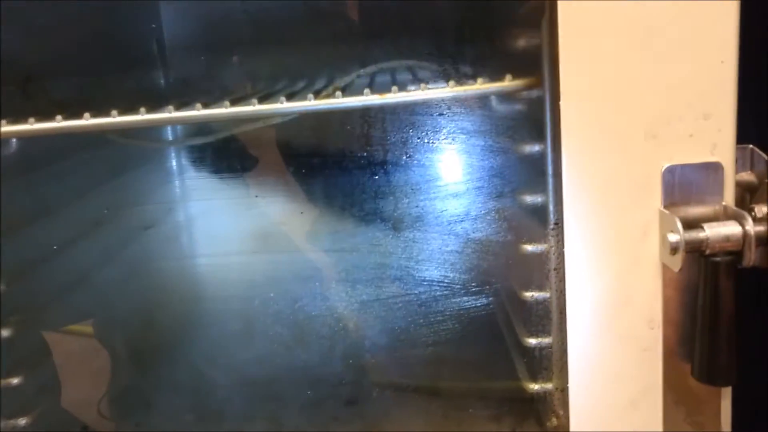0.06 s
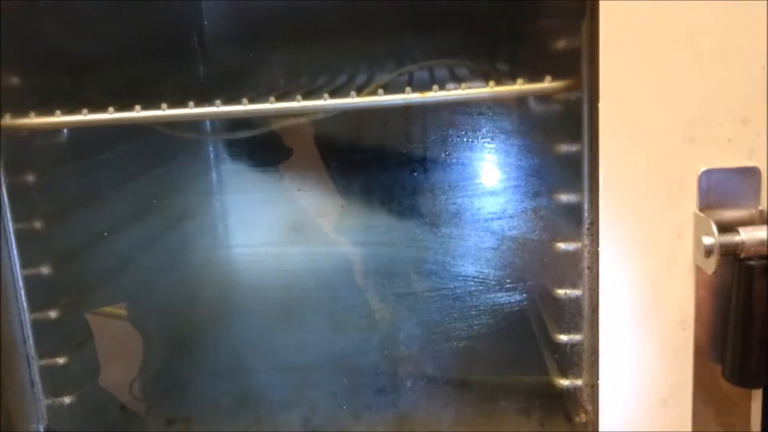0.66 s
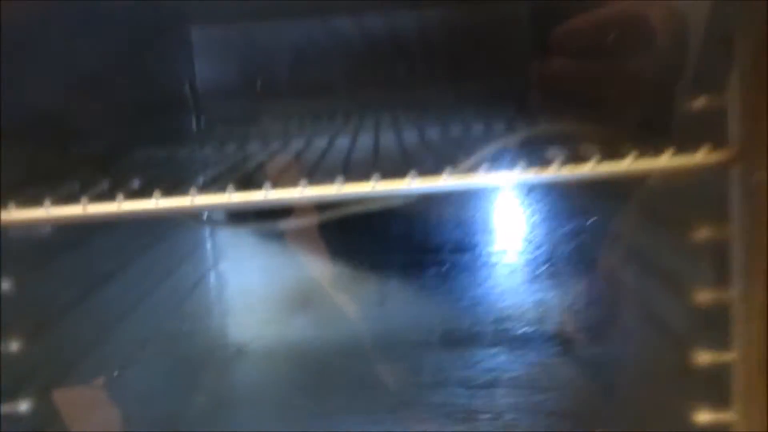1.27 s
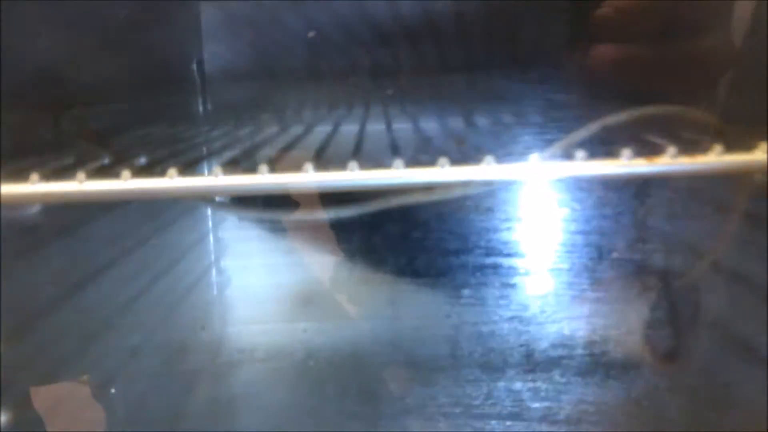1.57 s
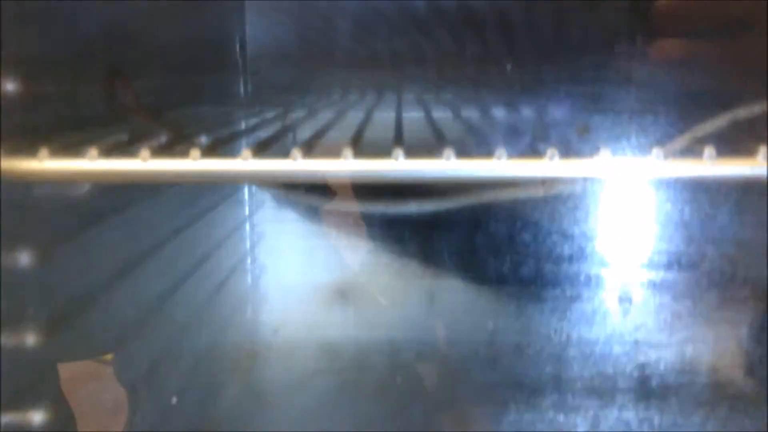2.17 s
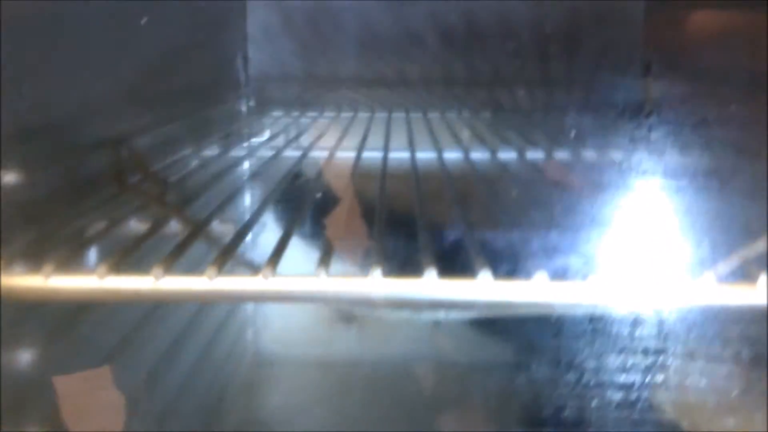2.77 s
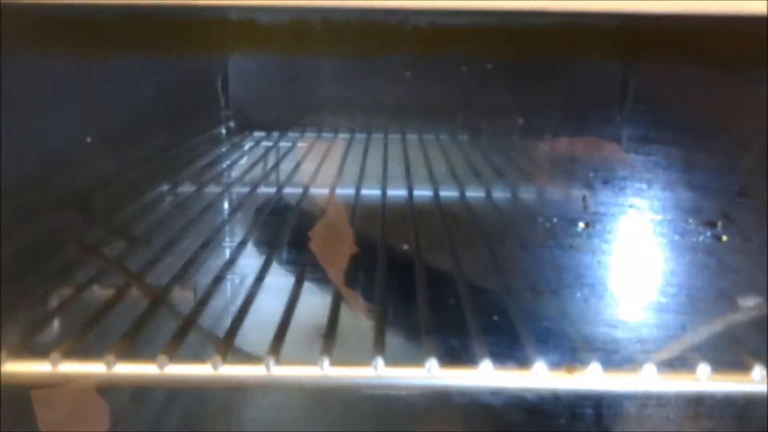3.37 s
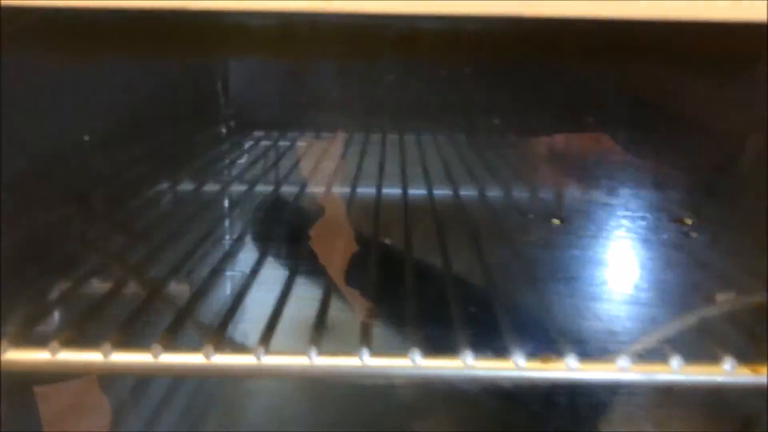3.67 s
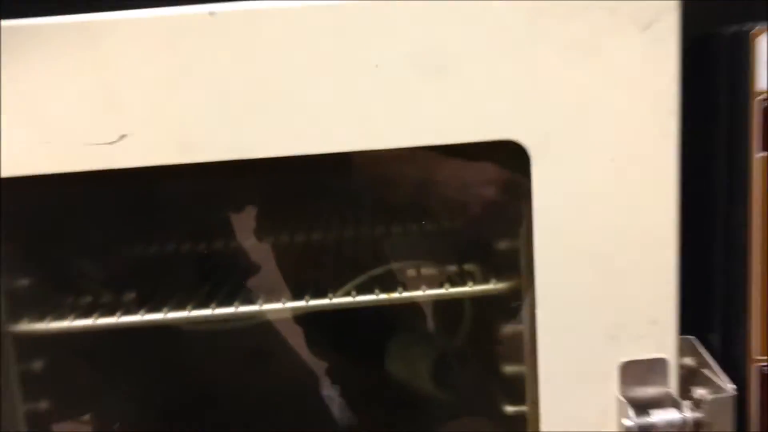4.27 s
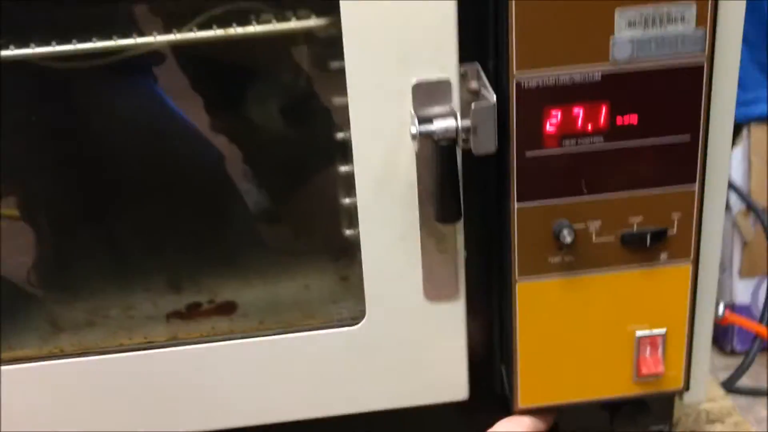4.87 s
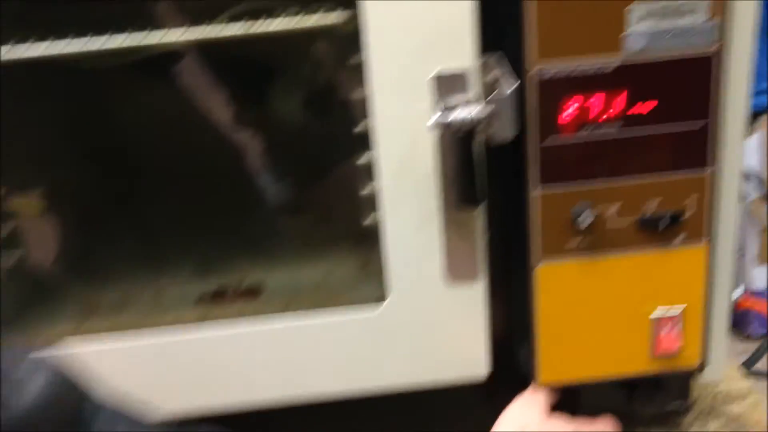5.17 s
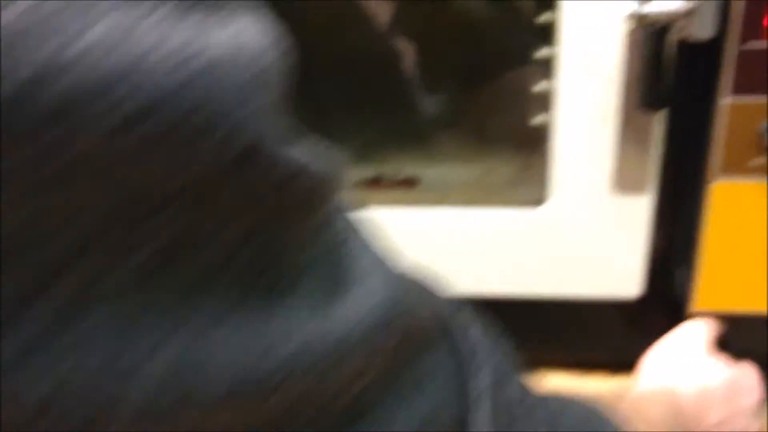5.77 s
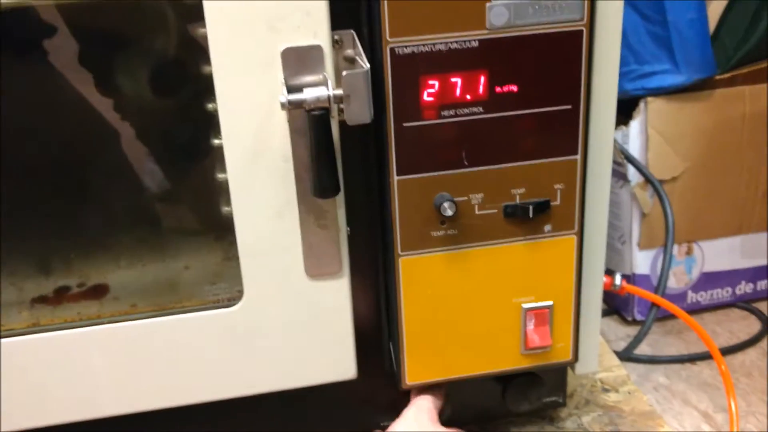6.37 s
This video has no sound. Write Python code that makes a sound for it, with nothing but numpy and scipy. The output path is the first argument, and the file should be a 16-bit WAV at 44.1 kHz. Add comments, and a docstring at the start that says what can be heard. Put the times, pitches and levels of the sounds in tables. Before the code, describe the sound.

A small piston air compressor drones and buzzes in a workshop while a vacuum generator hisses constantly beside a steel oven. Light handling bumps lead to a hard knock about a second in, which briefly ducks the sound. The hum and the slightly metallic hiss shift in tone as the hand-held microphone moves from the oven window to the control panel. A short cluster of knocks lands near the end.

```python
"""A small piston air compressor drones from the start, its valves buzzing, while a venturi vacuum generator
hisses beside a ringing steel oven. We listen through a hand-held phone at the oven door. Light handling
bumps lead to a hard knock at 1.2 s that ducks the phone's gain control. The phone rises to the window,
then from 4.3 s backs off to the control panel; the room's standing waves recolour hum and hiss on the way.
A last cluster of knocks lands just after 6 s."""
import sys
import numpy as np
from scipy import signal
from scipy.io import wavfile
from scipy.ndimage import uniform_filter1d

SR = 44100
rng = np.random.default_rng(int(sys.argv[2]) if len(sys.argv) > 2 else 0)


def output_pcm(signal):
    """Save a mono or channel-first signal as 16-bit PCM at the path in sys.argv[1].

    Samples are clipped to [-1, 1] before scaling.
    """
    pcm = np.clip(np.atleast_2d(signal).T, -1, 1) * 32767
    wavfile.write(sys.argv[1], SR, np.round(pcm).astype(np.int16))


N = 292383
TIME = np.arange(N) / SR
FRAME = 2048
SHAFT_HZ = 58.55

# the phone's move (0 door, 1 window, 2 panel): t/s, place for the hum, place for the hiss
PHONE_PATH = [(1.2, 0, 0), (1.5, 0.95, 1), (4.32, 1.03, 0.81), (4.5, 1.82, 1.4), (4.72, 1.73, 0.94),
              (4.87, 2.04, 2.24), (6.3, 1.98, 1.7)]
# pump partials: shaft multiple (rounded in use), level/dB at door, window, panel, left minus right/dB
PUMP_PARTIALS = [(1, -49, -49, -49.5, 21), (1.98, -46.5, -46.5, -47, 43), (3, -41.5, -38, -42.5, 3.5),
                 (4, -44, -41.5, -49, 11), (4.7, -49.5, -43.5, -36.5, 1), (5.95, -47, -45, -50.5, 11.5),
                 (7.14, -40.5, -42.5, -42, -12), (7.95, -56.5, -52, -48, 8), (9, -48, -48, -42, 1),
                 (10, -50, -48.5, -55.5, -44), (11, -51, -50.5, -51, 21), (12, -47, -51, -53.5, -12),
                 (13, -44.5, -49, -58, 2.5), (14, -50.5, -42.5, -37.5, 1), (15, -49.5, -52, -47.5, -6),
                 (16, -45, -47.5, -61, 5), (17, -62, -51, -44, 1), (19, -48.5, -69, -56, -3.5),
                 (20, -54, -60, -51, 0), (22, -48, -41, -49, 1), (26, -64, -57, -53.5, 7),
                 (28, -36.5, -43.5, -40.5, -0.5), (29, -57, -67, -44, -2.5), (30, -54, -43, -48, -6),
                 (34, -48.5, -43, -44, 1), (43, -45.5, -54.5, -54, -7), (46, -60, -58, -54, -4),
                 (47, -66, -50, -53, -11)]
# tone curve of the jet: f/Hz, level/dB at door, window, panel
JET_SPECTRUM = [(30, -80.0, -84.0, -81.0), (70, -71.5, -77.5, -76.5), (150, -70, -72, -70),
                (260, -74, -75.5, -73.5), (400, -70.5, -67.5, -70), (800, -71.5, -72.5, -72.0),
                (1150, -75.5, -76.0, -75.5), (1700, -71.5, -71.0, -70.5), (2150, -77.0, -75.0, -72.0),
                (2600, -74.0, -74.5, -71.0), (3300, -78.0, -77.0, -78.0), (4150, -77.5, -75.0, -76.5),
                (4700, -84.5, -78.0, -69.5), (5800, -74.5, -73.5, -74.0), (7300, -77.0, -76.5, -76.5),
                (9000, -81.0, -78.5, -75.0), (11500, -74.0, -77.5, -77.5), (14000, -80.0, -79.0, -77.5),
                (15400, -78.5, -79.5, -76.5)]
# steel resonances: f/Hz, width/Hz, lift/dB at door, window, panel (negative counts as 0)
OVEN_MODES = [(2430, 280, 7, 2, 5.5), (2675, 170, 3, 3.5, 1), (2940, 143, 5.5, 2.5, 7.5),
              (3200, 274, -1, 4, 9), (3410, 346, 10.5, 6.5, -1.5), (3730, 230, 5, 3, 3),
              (4500, 66, 9, -7, -32), (4726, 240, 14.5, 1, -2.5), (4810, 230, 4.5, 7, 1),
              (5120, 96, 9, 5, 2), (5380, 54, 4, 7, 1), (5500, 106, 6.5, -4, 4.5),
              (5890, 360, 5.5, 1.5, 3.5), (6360, 450, 3.5, 2.5, -1), (6970, 190, 2, 5, 3),
              (7770, 510, 6, 2.5, 4)]
# one resonance that slides down on leaving the window: t/s, f/Hz, lift/dB
SLIDING_MODE = [(4.15, 3960, 6), (4.62, 3920, 9), (4.78, 3500, 5), (4.92, 3280, 10.5)]
# stereo image at the two microphone ports: f/Hz, coherence (0-1), left minus right/dB
PORT_IMAGE = [(50, 0.05, -14), (201, 0.05, -34), (444, 0.6, 3), (950, 0.8, 0.5), (1730, 0, 7.5),
              (1835, 0.02, -22), (2130, .996, 0), (2330, .996, 0), (2560, .55, -2), (3300, .98, -1),
              (4250, 1, 0), (4500, 1, 0), (4560, 1, -3.5), (6230, 0.88, -1.5), (8750, 0.34, -5.5),
              (8700, 0.94, 2), (11500, 0.7, -5), (15000, 0.4, -6.5)]
# how openly sound gets past hand, body and oven: t/s, treble level/dB
OPENNESS = [(0, 1.5), (1.15, 0.5), (1.55, 0.8), (1.95, 1.5), (2.15, 0.5), (2.75, 0.3), (3.0, 0),
            (3.92, -0.5), (4.08, 3.5), (4.2, 0), (4.35, -0.5), (4.45, 2), (4.76, 3), (4.83, -0.65),
            (6.2, 0.45), (6.38, 1.1)]
# brief dips in hum and hiss: t/s, depth/dB
LEVEL_DIPS = [(.07, 1.5), (2.89, 2.5), (3.1, 2), (3.41, 2), (3.52, 2), (6.08, 2.5), (6.45, 3)]
# handling knocks: t/s, click level/dB, thud level/dB, thud f/Hz
HANDLING = [(0.231, -50, -18, 122), (0.988, -52, -19, 125), (1.079, -58, -22, 110),
            (1.1915, -14.5, -29, 300), (1.1933, -8.5, -10.5, 400), (1.1957, -20, -3, 137),
            (6.062, -26, -29, 162), (6.0677, -33, -11.5, 149), (6.074, -20.5, -17, 620),
            (6.08, -34, -16, 155)]
# ring of the phone's case: f/Hz, t60/s, level/dB
CASE_MODES = [(290, 0.018, 1.5), (600, 0.0041, 2), (1320, 0.0031, 4), (3230, 0.0048, -2)]
# bands that swell or fade in the standing waves: t/s, half duration/s, f/Hz, width/Hz, lift/dB
ROOM_SWELLS = [(1.9, 0.58, 3385, 89, 11), (1.72, 0.25, 3570, 130, 7), (3.86, .17, 3600, 520, 5.5),
               (4.45, 0.34, 14000, 5000, 4.5), (1.93, 0.56, 1360, 270, 3.5), (1.14, 0.22, 1639, 14, 3.5),
               (1.88, 0.37, 1639, 12, 8), (3.77, 0.71, 527, 19, -5), (4.28, 0.31, 1288, 8.1, -8.5),
               (4.2, 0.4, 410, 13, 4), (4.48, 0.38, 586, 24, 8.5), (4.63, 0.15, 176, 14, 2),
               (4.53, 0.18, 2752, 22, 9.5), (4.6, 0.18, 530, 290, 3.5), (4.52, 0.33, 761, 14, 9),
               (4.2, 0.2, 2200, 15, -6), (4.35, 0.18, 5230, 110, 14), (4.3, 0.32, 6900, 340, 1),
               (5.7, 0.21, 1288, 9, -22), (6.4, 0.43, 1288, 6.5, 7.5), (6.25, 0.28, 1639, 21, -14)]


def undb(db):
    """Decibels to gain."""
    return np.exp(np.log(10) / 20 * np.asarray(db))


def curves(table, at):
    """The columns of a table as straight-line envelopes."""
    x, *columns = np.transpose(table)
    return [np.interp(at, x, c) for c in columns]


def spectra(table, hz):
    """The columns of a table as EQ curves on a log-frequency axis."""
    x, *columns = np.transpose(table)
    return [np.interp(np.log(hz + 1), np.log(x), c) for c in columns]


def bell(hz, centre, width):
    """Shape of a resonance, 1 at its centre."""
    return 1 / (1 + (2 * (hz - centre) / width) ** 2)


def wobble(rate_hz):
    """Random sample-and-hold, slewed twice."""
    hold = int(SR / rate_hz)
    held = np.repeat(rng.standard_normal(N // hold + 1), hold)
    return 0.87 * uniform_filter1d(uniform_filter1d(held, hold), hold)[:N]


def speckle(shape, size):
    """Smooth random field of spread 1."""
    field = rng.standard_normal(shape)
    for axis, width in enumerate(size):
        field = uniform_filter1d(field, width, axis=axis)
    return field / field.std()


def pan(left_minus_right_db):
    """Left and right gains at constant power."""
    gains = undb(np.array([left_minus_right_db, -left_minus_right_db]) / 2)
    return gains / np.sqrt(np.mean(gains ** 2, axis=0))


def place_mix(t, hiss=False):
    """Crossfade between door, window and panel, for the hum or the hiss; the weights add up to 1."""
    hum_place, hiss_place = curves(PHONE_PATH, t)
    place = np.clip(hiss_place if hiss else hum_place, 0, 2)
    return np.maximum(1 - abs(place - np.arange(3)[:, None]), 0)


def port_lag(hz, flip_from_hz=1330, flip_to_hz=1800, delay_from_hz=2208):
    """Phase between the ports in radians: none in the bass, a polarity flip above, then a steady delay."""
    flip = np.clip((hz - flip_from_hz) / (flip_to_hz - flip_from_hz), 0, 1)
    return np.pi * flip + 2 * np.pi * np.maximum(hz / delay_from_hz - 1, 0)


def standing_waves(hz, t):
    """Lift in dB as the phone drifts through the room's peaks and nulls."""
    return sum(lift_db * np.exp(-((t - when) / half_s) ** 2) * bell(hz, centre, width)
               for when, half_s, centre, width, lift_db in ROOM_SWELLS)


def shading(t, low_share=0.19, fall_s=0.029, recovery_db_per_s=10):
    """Level rides in dB for lows and highs: obstacles shade short waves most; brief dips hit both."""
    open_db, = curves(OPENNESS, t)
    dip_db = 0
    for when, depth_db in LEVEL_DIPS:
        fall = np.clip((t - when) / fall_s, 0, 1)
        dip_db += fall * np.clip(depth_db - recovery_db_per_s * (t - when - fall_s), 0, depth_db)
    return low_share * open_db - dip_db, open_db - dip_db


def compressor(turns, waver_db=1.0, port_spread_rad=0.13, fully_scattered_from=8):
    """The drone: harmonics of the piston stroke, each swelling and fading in its own standing wave."""
    t = TIME[::FRAME]
    mix, out = place_mix(t), np.zeros((2, N))
    for multiple, *place_db, pan_db in PUMP_PARTIALS:
        harmonic = round(multiple)
        hz = harmonic * SHAFT_HZ
        db = np.array(place_db) @ mix + standing_waves(hz, t) + waver_db * speckle(t.shape, size=(4,))
        envelope = np.sqrt(2) * np.interp(TIME, t, undb(db))
        # the lowest harmonics land together as one thump a stroke; the room scatters the higher ones
        scatter = min(multiple / fully_scattered_from, 1) * rng.random()
        phase = 2 * np.pi * (harmonic * turns + scatter)
        # standing waves also shift the phase between the ports
        lag = np.interp(TIME, t, port_lag(hz) + port_spread_rad * rng.standard_normal(len(mix)) @ mix)
        out += envelope * pan(pan_db)[:, None] * np.sin([phase, phase - lag])
    low_db, _ = shading(TIME)
    return out * undb(low_db)


def valve_buzz(turns, buzz_db=-59, scatter_db=3, rolloff_hz=2200):
    """Snapping valves fill the drone's gaps with faint upper harmonics, at random levels in each place."""
    t = TIME[::FRAME]
    mix, out = place_mix(t), np.zeros((2, N))
    in_drone = {round(row[0]) for row in PUMP_PARTIALS}
    for harmonic in sorted(set(range(18, 45)) - in_drone):
        hz = harmonic * SHAFT_HZ
        db = buzz_db + scatter_db * rng.standard_normal(len(mix)) @ mix
        envelope = np.sqrt(2) * undb(db) / np.hypot(1, (hz / rolloff_hz) ** 2)
        phase = 2 * np.pi * (harmonic * turns + rng.random())
        out += np.interp(TIME, t, envelope) * np.sin([phase, phase - port_lag(hz)])
    low_db, _ = shading(TIME)
    return out * undb(low_db)


def venturi(turns, throb=0.028, flutter_db=0.5, ripple_db=1.3, wander_db=1.2, crossover_hz=2000):
    """The hiss: jet turbulence, throbbing slightly with each stroke and coloured by nearby steel."""
    jet = rng.standard_normal((4, N)) * (1 + throb * np.cos(2 * np.pi * turns))
    jet *= undb(flutter_db * wobble(14))
    hz, t, noises = signal.stft(jet, SR, nperseg=FRAME)
    bands = hz[:, None]
    # reflections carve fine peaks and dips that differ by place and wander as the hand sways
    place_db = np.array(spectra(JET_SPECTRUM, hz))
    place_db += ripple_db * speckle(place_db.shape, size=(1, 4))
    eq_db = place_db.T @ place_mix(t, hiss=True)
    eq_db += wander_db * speckle(eq_db.shape, size=(9, 7))
    low_db, high_db = shading(t)
    lows = 1 / (1 + (bands / crossover_hz) ** 6)
    eq_db += lows * low_db + (1 - lows) * high_db
    eq_db += oven_resonances(bands, t) + standing_waves(bands, t)
    coloured = stereo_ports(noises, hz) * undb(eq_db) * np.sqrt(SR / 2)
    _, hiss = signal.istft(coloured, SR, nperseg=FRAME)
    return hiss[:, :N]


def oven_resonances(hz, t, slide_width_hz=330):
    """Steely lift in dB: the oven's modes vary by place, and one slides with the phone's distance."""
    mix = place_mix(t, hiss=True)
    modes_db = sum(bell(hz, centre, width) * (np.maximum(place_db, 0) @ mix)
                   for centre, width, *place_db in OVEN_MODES)
    slide_hz, slide_db = curves(SLIDING_MODE, t)
    return modes_db + slide_db * bell(hz, slide_hz, slide_width_hz)


def stereo_ports(noises, hz, right_share=0.59):
    """Width of the hiss: direct sound reaches the far port late; reverberation is uncorrelated."""
    from_right, from_left, room_left, room_right = noises
    coherence, pan_db = (c[:, None] for c in spectra(PORT_IMAGE, hz))
    coherence = np.clip(coherence, 0, 1)
    late = np.exp(-1j * port_lag(hz))[:, None]
    right, left = np.sqrt(right_share) * from_right, np.sqrt(1 - right_share) * from_left
    direct = np.array([right * late + left, right + left * late])
    room = np.array([room_left, room_right])
    return pan(pan_db) * (np.sqrt(coherence) * direct + np.sqrt(1 - coherence) * room)


def knocks(crack_db=-8, crack_s=0.00097, thud_t60=0.016, sway_hz=62, sway_t60=0.06, sway_db=-35):
    """Handling: a click rings the phone's case and a thud pushes the two ports in opposite directions."""
    out = np.zeros((2, N))
    t = TIME[:SR // 5]

    def ring(hz, t60):
        """One damped mode."""
        return np.sin(2 * np.pi * hz * t) * np.exp(-np.log(1000) * t / t60)

    case = sum(undb(db) * ring(hz, t60) for hz, t60, db in CASE_MODES) / 2
    sway = undb(sway_db) * ring(sway_hz, sway_t60)
    for when, click_db, thud_db, thud_hz in HANDLING:
        crack = undb(crack_db) * rng.standard_normal((2, len(t))) * np.exp(-t / crack_s)
        thud = np.array([ring(thud_hz, thud_t60), -ring(thud_hz * 1.37, thud_t60)]) + sway
        start = int(when * SR)
        out[:, start:start + len(t)] += undb(click_db) * (case + crack) + undb(thud_db) * thud
    return out


def scene(drift_hz=0.029, drone_trim_db=-2.42, hiss_trim_db=-1.12):
    """The mix: one near-steady motor drives drone, buzz and air supply; the knocks sit on top."""
    turns = np.cumsum(SHAFT_HZ + drift_hz * wobble(5.4)) / SR
    hum = undb(drone_trim_db) * compressor(turns) + valve_buzz(turns)
    return hum + undb(hiss_trim_db) * venturi(turns) + knocks()


def record(dry, threshold_db=-19.0, attack_s=0.00067, release_db_per_s=9, low_cut_hz=36, top_hz=15480):
    """The phone's chain: low cut, gain control that ducks on a hard knock and creeps back, high cut."""
    dry = signal.sosfilt(signal.butter(4, low_cut_hz, "high", fs=SR, output="sos"), dry)
    power = uniform_filter1d(np.mean(dry ** 2, axis=0), size=150)
    over_db = np.maximum(10 * np.log10(np.maximum(power, 1e-12)) - threshold_db, 0)
    recovery_db = release_db_per_s * TIME
    duck_db = np.maximum.accumulate(over_db + recovery_db) - recovery_db
    pole = np.exp(-1 / (attack_s * SR))
    duck_db = signal.lfilter([1 - pole], [1, -pole], duck_db)
    high_cut = signal.ellip(12, .1, 80, top_hz, fs=SR, output="sos")
    return signal.sosfilt(high_cut, dry * undb(-duck_db))


dry = scene()
out = record(dry)
output_pcm(out)
```